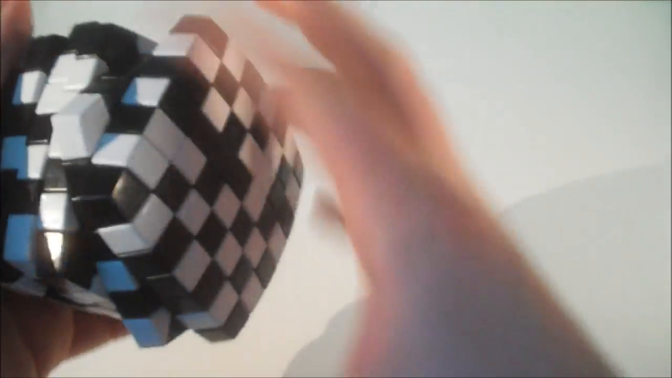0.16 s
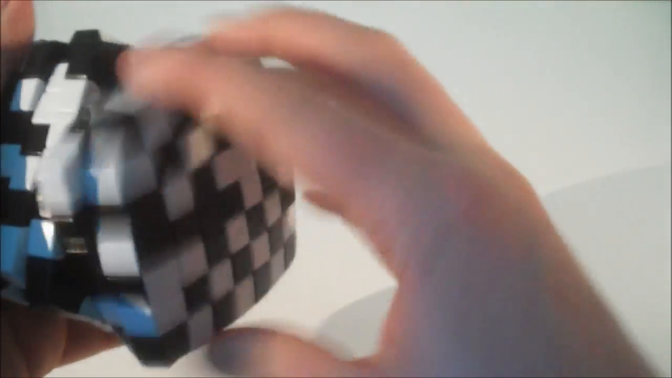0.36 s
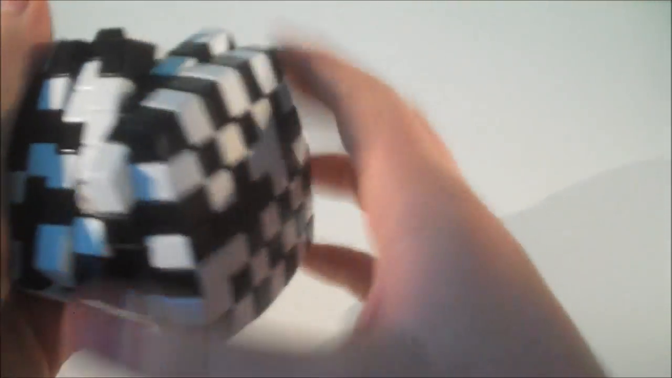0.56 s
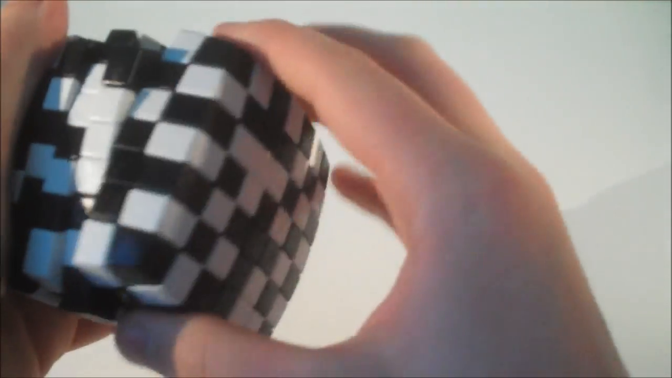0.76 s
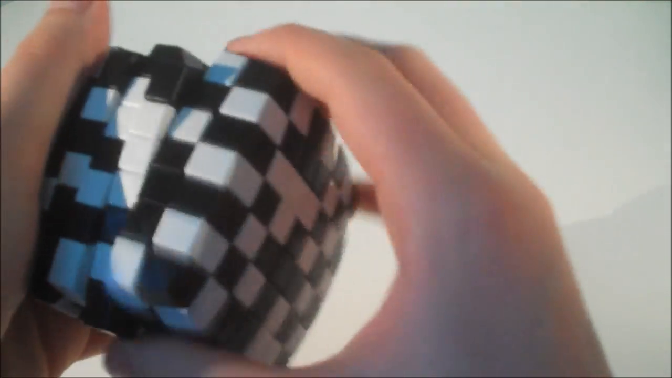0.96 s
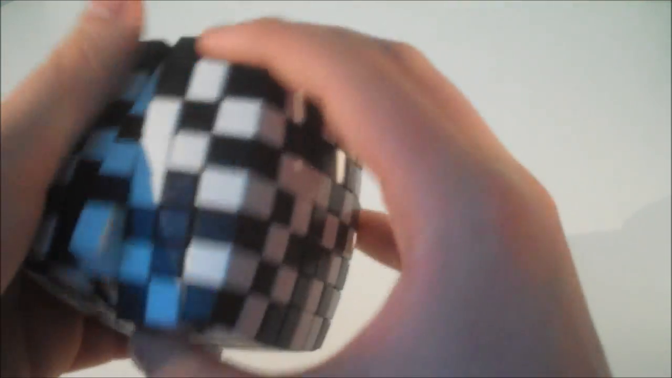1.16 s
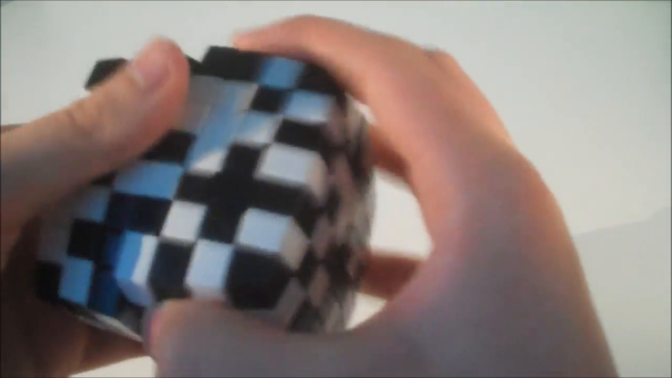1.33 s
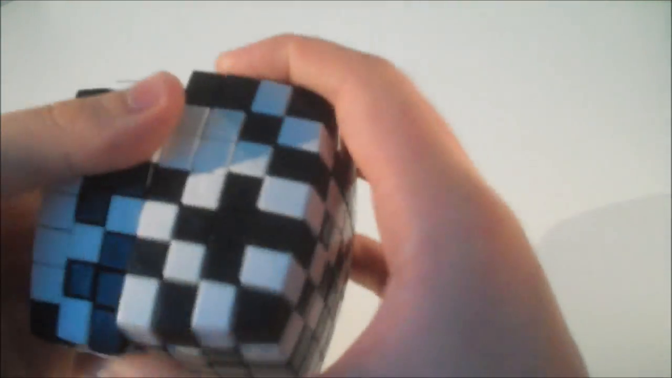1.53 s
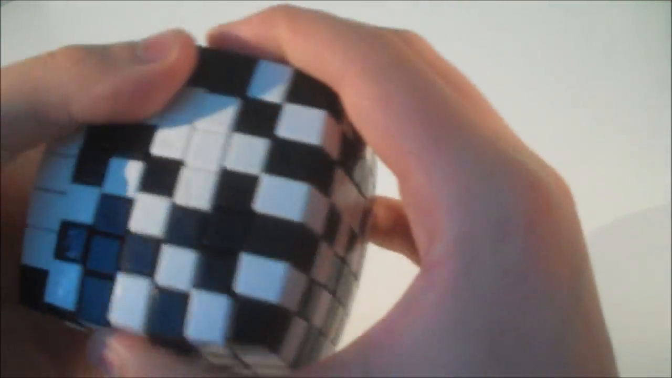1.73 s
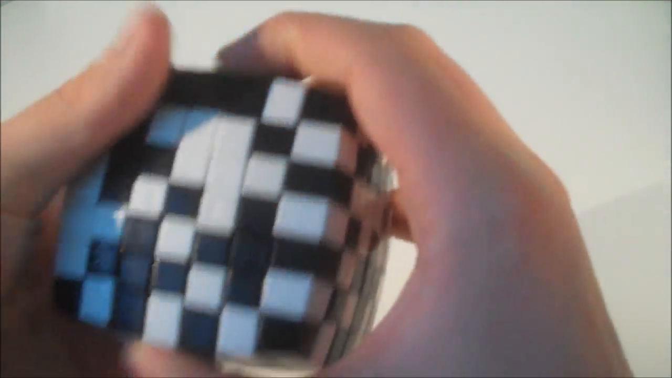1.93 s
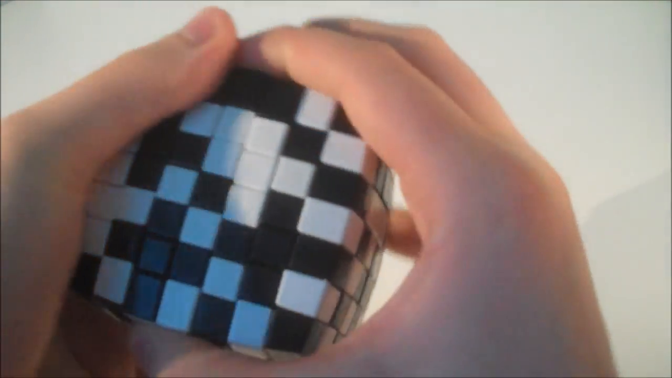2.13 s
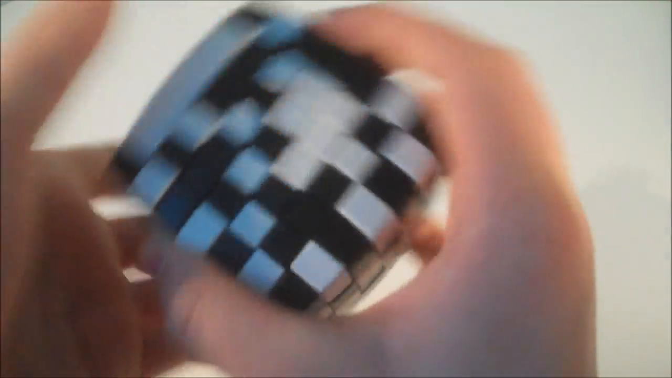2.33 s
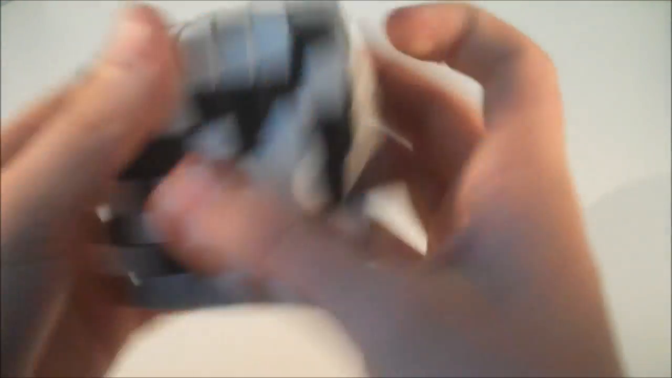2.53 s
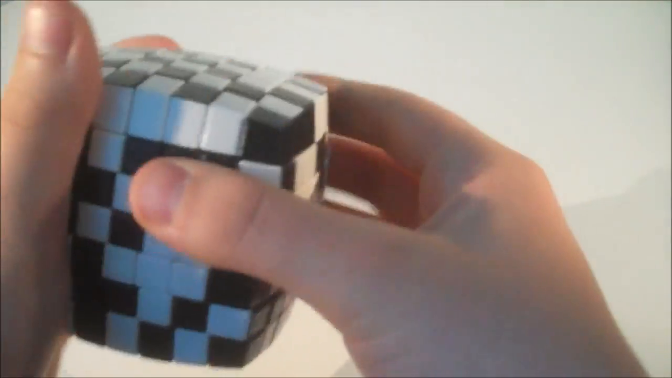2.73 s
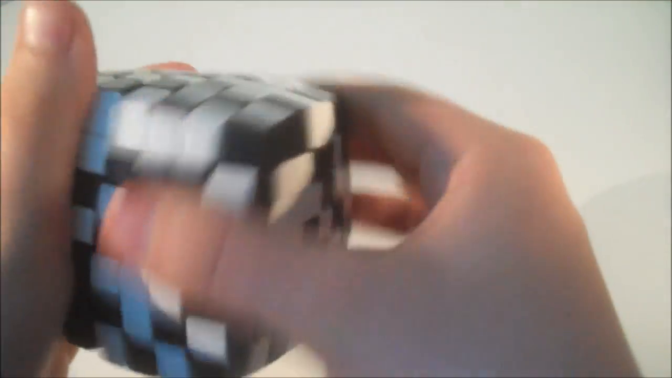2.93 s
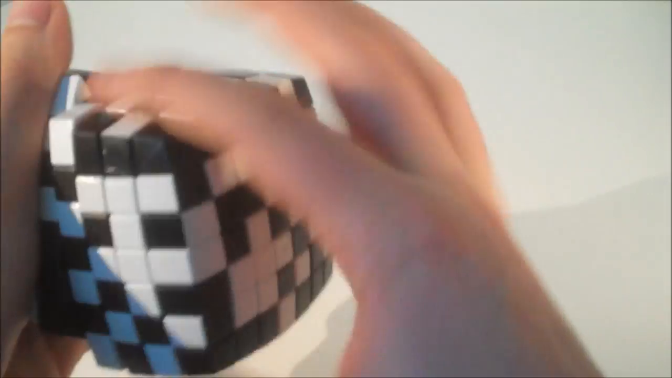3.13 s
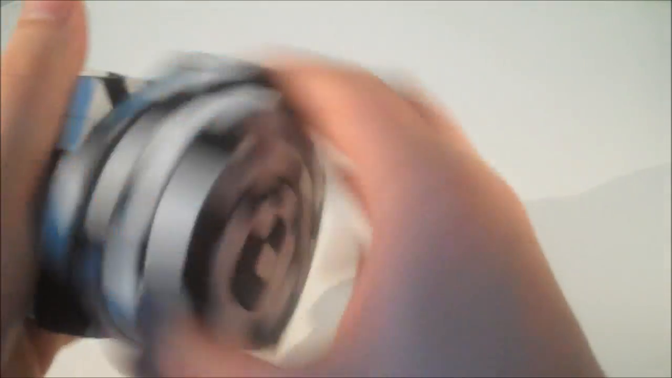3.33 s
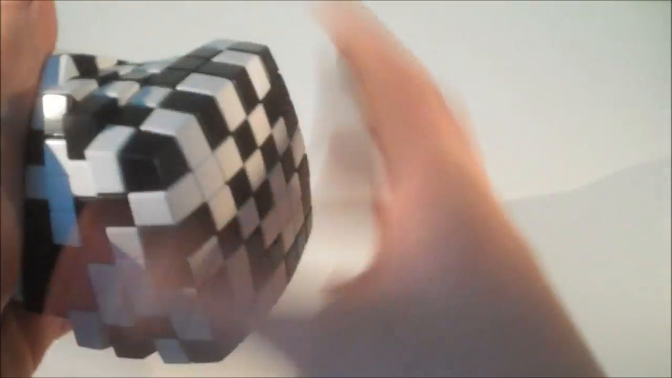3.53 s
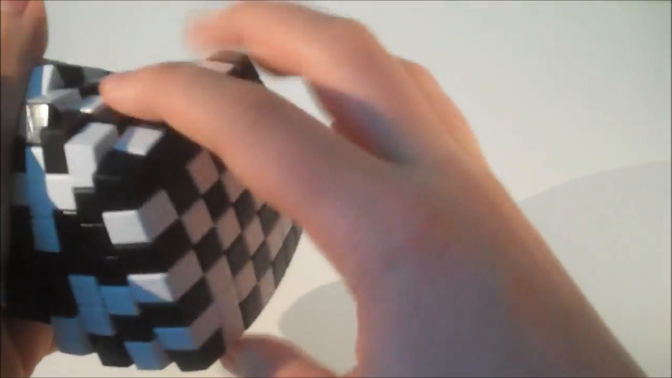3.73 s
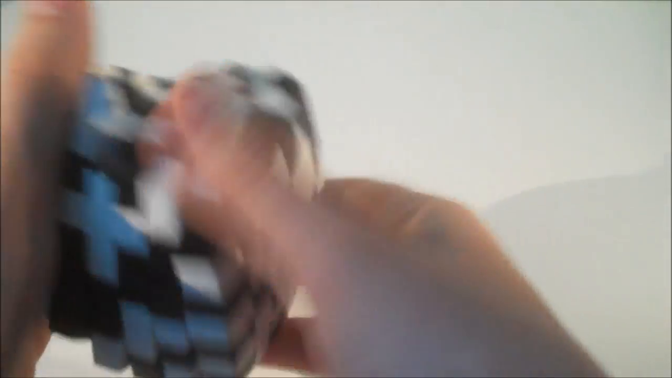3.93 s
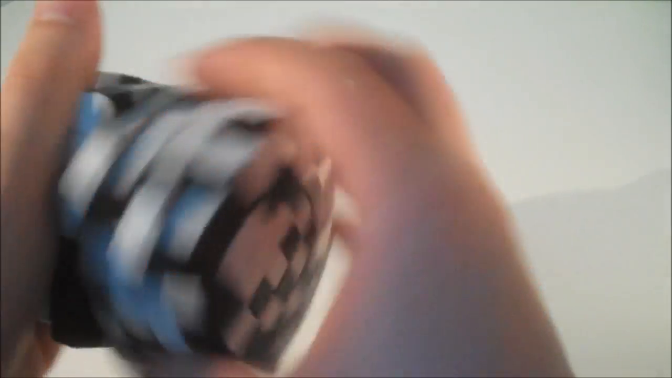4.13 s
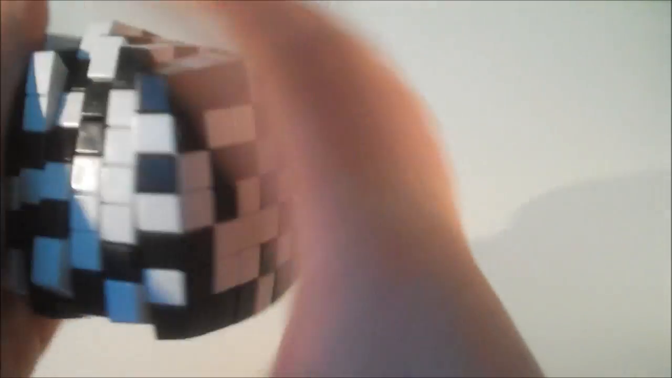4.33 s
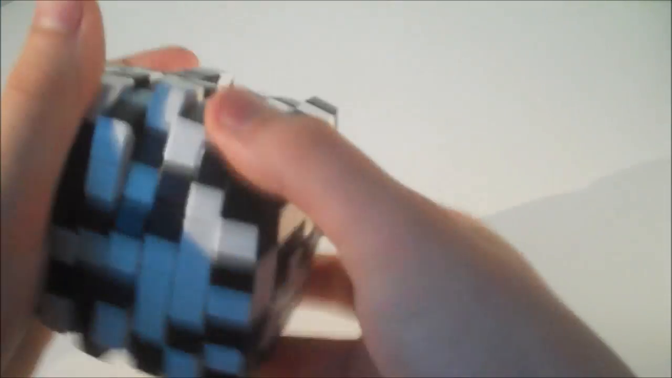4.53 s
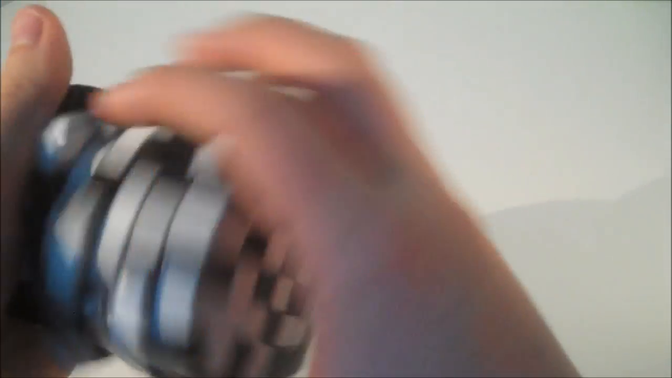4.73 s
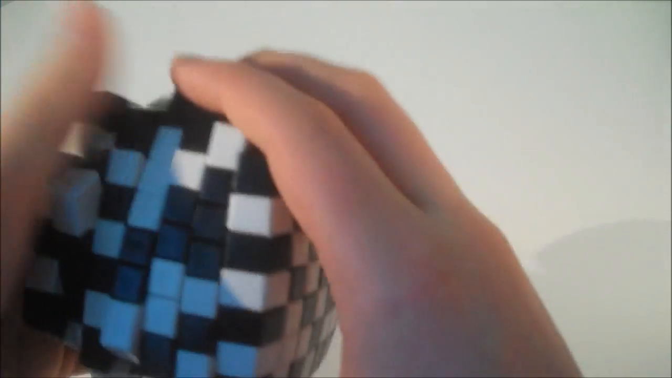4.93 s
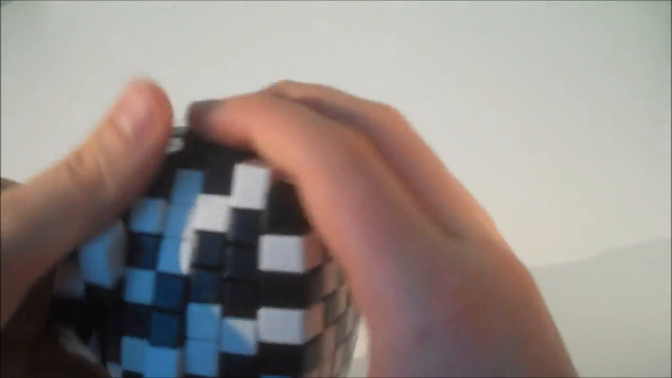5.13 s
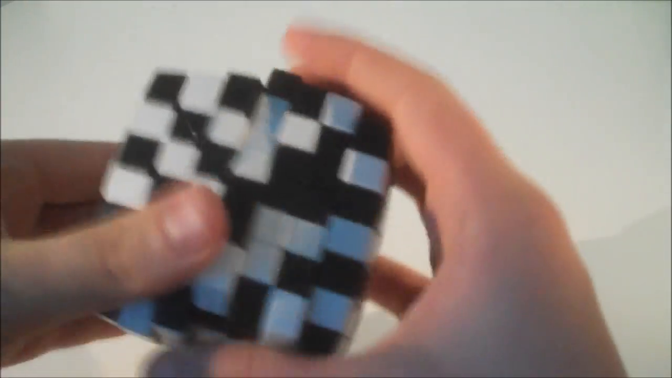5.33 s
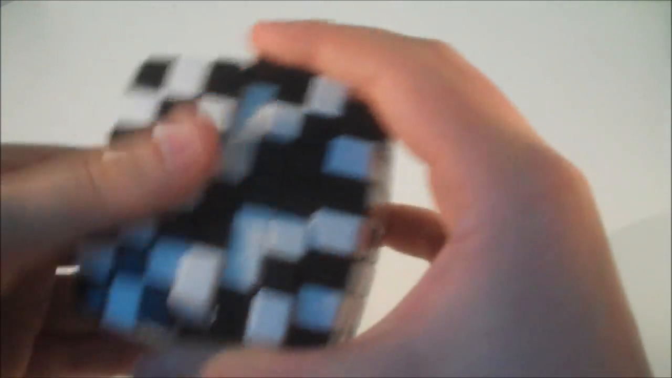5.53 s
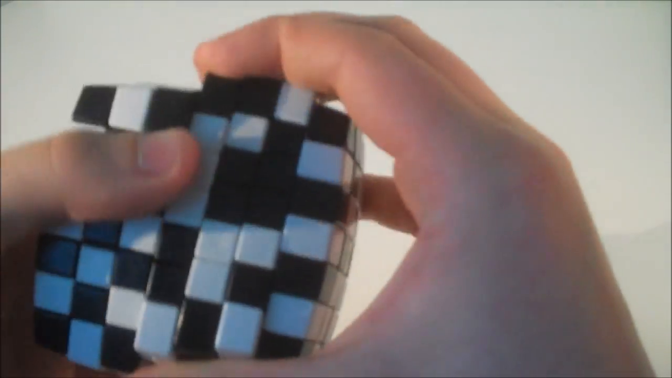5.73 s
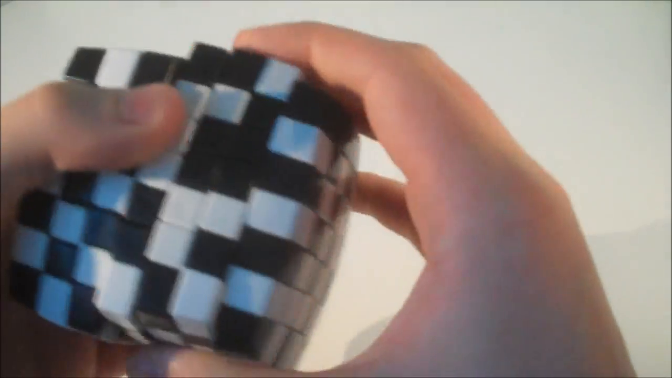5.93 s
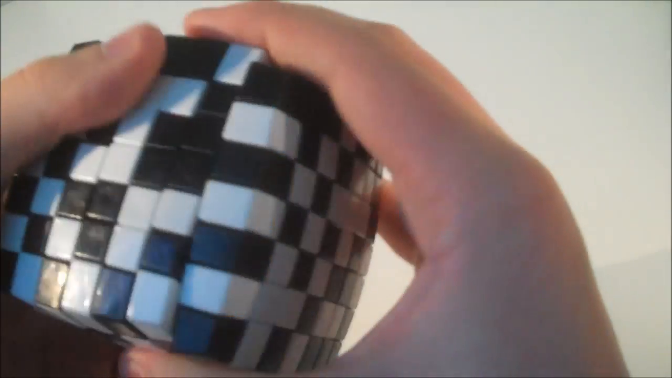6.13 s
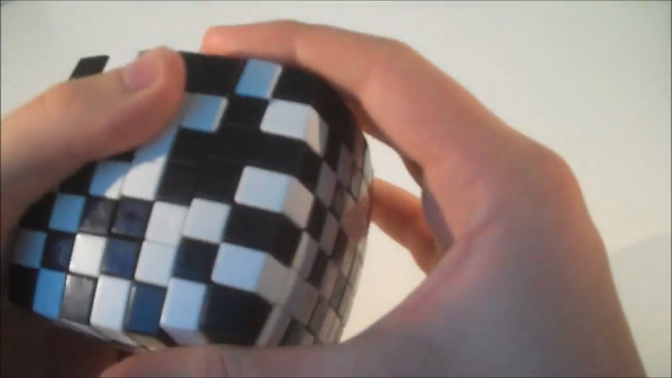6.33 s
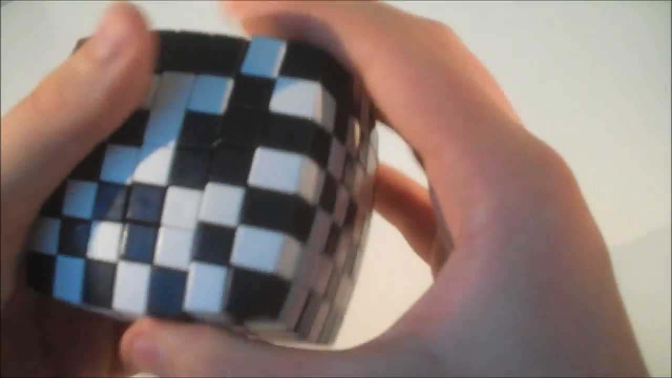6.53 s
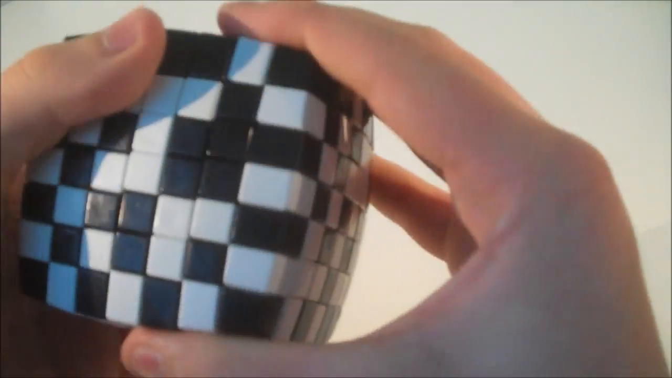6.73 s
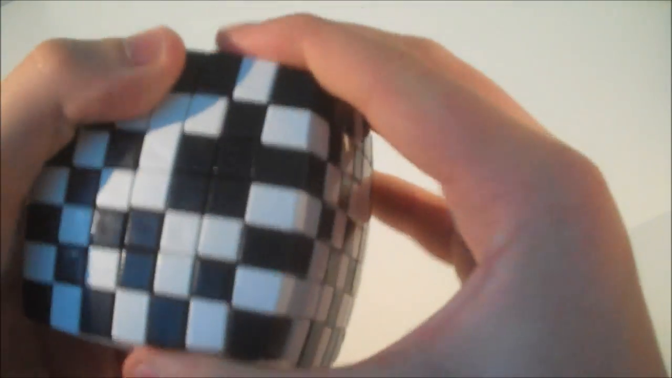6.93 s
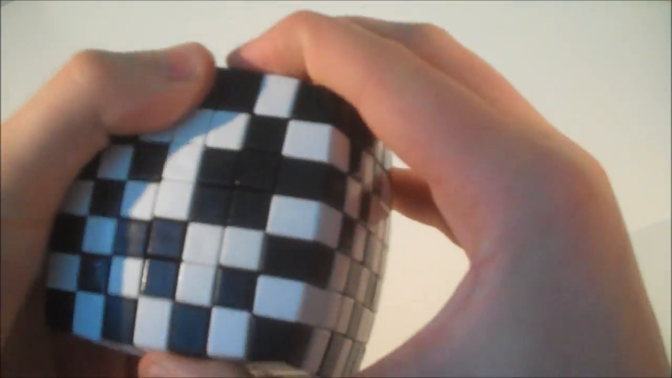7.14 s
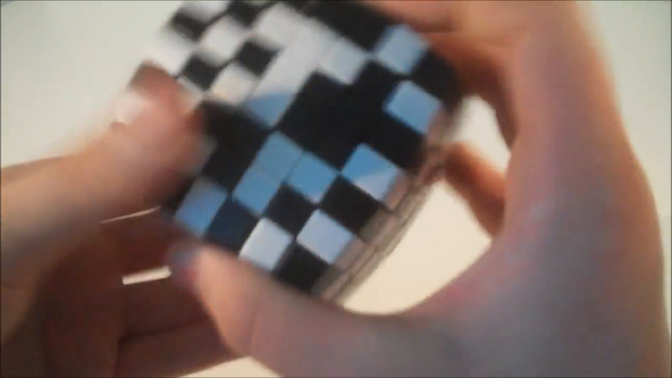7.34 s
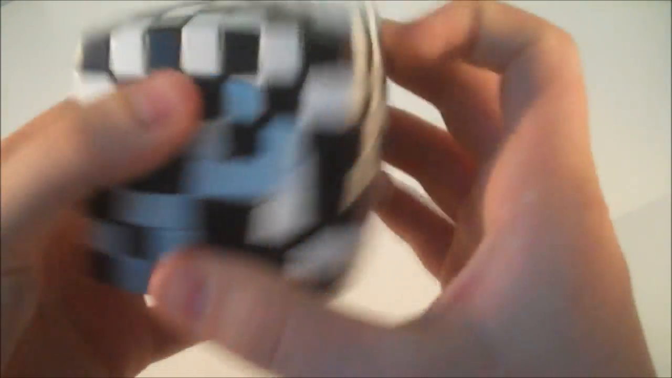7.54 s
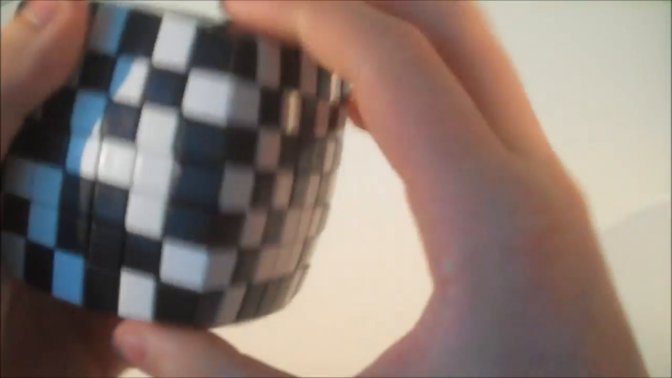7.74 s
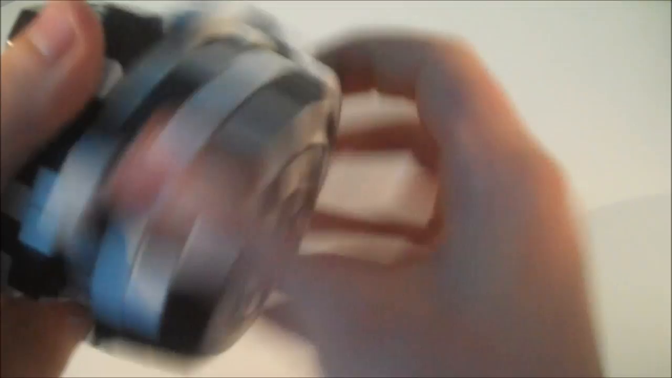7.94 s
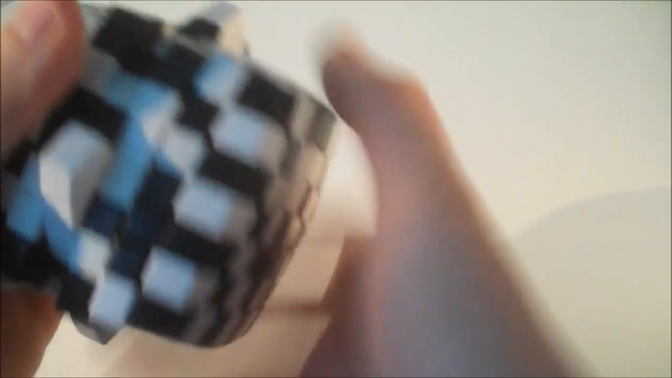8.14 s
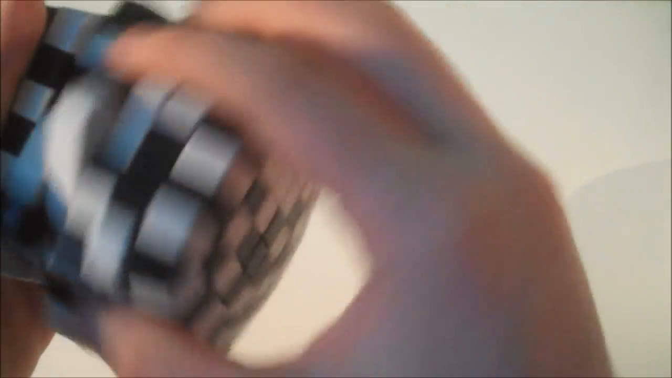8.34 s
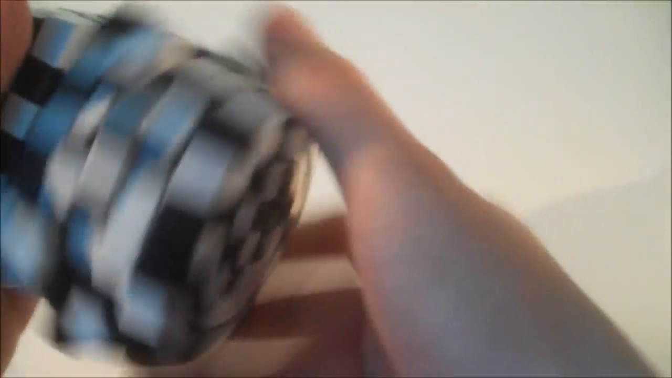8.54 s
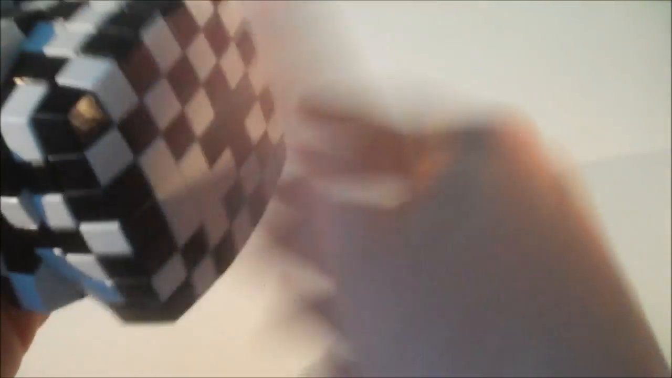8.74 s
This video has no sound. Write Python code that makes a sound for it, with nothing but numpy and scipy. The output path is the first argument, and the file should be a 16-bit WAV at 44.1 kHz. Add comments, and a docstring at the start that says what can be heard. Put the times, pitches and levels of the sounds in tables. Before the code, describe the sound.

Hard plastic layers snap and rasp in quick bursts between stretches of fine clicking and rubbing, close and dry over faint room hum.

```python
"""A many-layered plastic puzzle cube is turned quickly by hand, close to a stereo microphone in a small room.
Small pieces click as layers are lined up; a fast turn drags rows of them into a dense rasp.
Each contact is a noise burst with a snap and random ring pitches; modal resonators add the hollow body.
Decaying noise makes the short room tail; noise and sines that swell slowly together make the soft air
and low mains hum."""
import sys
import numpy as np
from scipy import signal
from scipy.fft import rfft, irfft, next_fast_len
from scipy.io import wavfile
from scipy.ndimage import uniform_filter1d

SR = 44100
rng = np.random.default_rng(int(sys.argv[2]) if len(sys.argv) > 2 else 0)


def master(y):
    """Save y as 16-bit WAV."""
    cut = np.clip(np.atleast_2d(y).T, -1, 1)
    pcm = np.round(cut * 32767)  # scale
    wavfile.write(sys.argv[1], SR, pcm.astype(np.int16))


N = 386757
TIME = np.arange(N) / SR
RING, LEAD = 2048, 256  # samples: length of one contact, lead-in before its snap

# stretches in which the fingers work the layers into line: start_s, end_s, rubbing_level_db
ALIGNING = [(1.05, 2.05, -53), (2.05, 2.38, -58), (2.46, 2.999, -55), (5.18, 6.001, -55), (6.03, 6.93, -53),
            (7.03, 7.18, -52), (7.34, 7.77, -53)]


def undb(db):
    """Amplitude ratio of a level in dB."""
    return 10 ** (np.asarray(db) / 20)


def unit(x):
    """Scales to an RMS of 1."""
    return x / np.sqrt(np.mean(x ** 2))


def along(table, size):
    """Reads a (Hz, value) table at the bins of a transform, on a log-frequency axis."""
    hz, value = np.transpose(table)
    bins_hz = np.fft.rfftfreq(size, 1 / SR)
    return np.interp(np.log(bins_hz + 1), np.log(hz), value)


def coloured(x, table):
    """Causal filter with a (Hz, dB) response, from the folded cepstrum."""
    size = 2 * next_fast_len(x.shape[-1])
    cepstrum = irfft(np.log(undb(along(table, size))))
    cepstrum[1:size // 2] *= 2
    cepstrum[size // 2 + 1:] = 0
    response = np.exp(rfft(cepstrum))
    return irfft(rfft(x, size) * response)[..., :x.shape[-1]]


def fade(t, t60):
    """Exponential decay, 60 dB down after t60 seconds."""
    return np.exp(-np.log(1000) * t / t60)


def through(x, response):
    """Convolves each channel with its response."""
    return signal.fftconvolve(np.atleast_2d(x), np.atleast_2d(response), axes=1)[:, :N]


def add(out, s, sound):
    """Mixes a contact into out so that its snap falls at time s."""
    start = int(np.clip(s * SR - LEAD, 0, N - 1))
    out[:, start:start + sound.shape[1]] += sound[:, :N - start]


def piece(knock_db, edge_db, scrape, snap=3.64, scrape_s=0.0023, rebound=0.43, rebound_s=.005,
          chatter_t60=0.021, ring_t60=0.015, ring=0.46, ring_hz=4512.0, ring_octaves=0.793,
          lag_s=2.4e-5, lag_scatter=0.32):
    """One contact: a brief scrape, a snap, the ring of that piece, and a softer rebound among its neighbours."""
    # colour of a contact between plastic pieces: pitch_hz, gain_db
    plastic = [(88, -57), (150, -24), (687, -14), (850, -5.5), (918, -2.5), (1160, -9.5), (1320, -13.5),
               (2360, -5.5), (2700, -1.5), (3970, -0.5), (5610, -2.5), (10400, -10), (13600, -26),
               (15000, -27)]
    # how unlike the two microphone ports hear a piece: pitch_hz, side_noise_db
    spread = [(300, -25), (1000, -15), (3000, -9.5), (7000, -7), (13000, -8.5)]
    t = (np.arange(RING) - LEAD) / SR
    after = np.maximum(t, 0)
    pitches_hz = ring_hz * 2 ** (ring_octaves * rng.standard_normal(size=(3, 1)))
    pitches_hz = np.minimum(pitches_hz, SR / 2)
    own = ring * np.sin(2 * np.pi * pitches_hz * after).sum(axis=0) * fade(after, ring_t60)

    slide, wait, share, hardness = .5 + rng.random(size=4)
    rub = scrape * np.exp(-np.abs(t) / (scrape_s * slide))
    chatter = np.where(t < 0, rub, fade(after, chatter_t60))
    late = t - rebound_s * wait
    bounce = rebound * share * (late > 0) * fade(np.abs(late), chatter_t60)
    mid, side = rng.standard_normal((2, RING)) * np.hypot(chatter, bounce)
    mid = mid + own
    # snap: push and recoil, so mostly treble
    mid[LEAD] += snap * hardness
    mid[LEAD + 2] -= snap * hardness

    side = coloured(side, spread)
    pair = coloured(np.array([mid + side, mid - side]), plastic)
    # a broad face knocks low, a sharp corner ticks high
    pair = coloured(pair, [(1300, knock_db), (2600, 0.032), (4500, 0.011), (7500, edge_db)])
    # right-port delay, scattered from piece to piece
    lag = lag_s * (1 + lag_scatter * rng.standard_normal())
    delay = np.exp(-2j * np.pi * np.fft.rfftfreq(RING, 1 / SR) * lag)
    pair[1] = irfft(rfft(pair[1]) * delay)
    return pair / np.sqrt(np.mean(pair[:, LEAD:2 * LEAD] ** 2))


def clicks(gain_db, knock_db, edge_db, scrape=0.59, hard_db=-23, scrape_slope=0.48):
    """Each snap is played by a piece of its own; the harder it jams, the more it scrapes before it gives."""
    # pieces snapping into place: time_s, level_db (before gain_db), brightness_db
    snaps = [(.057, -24, 0), (.094, -27, -8), (.116, -23.5, 1), (.391, -37, 10), (.451, -24, 0.5),
             (.708, -51.5, 2), (.741, -38.5, -2), (.845, -42, 13), (.854, -27, 6), (.936, -42, -4),
             (1.046, -42, -2), (1.066, -30, -2), (1.102, -26, 9), (1.12, -23, 4.5), (1.175, -30.5, 5),
             (1.226, -32.5, -4), (1.246, -39, -5), (1.268, -35, -5), (1.297, -23.5, 9), (1.317, -31, 14),
             (1.378, -29, -1), (1.43, -20, 0), (1.558, -37.5, -8), (1.585, -35, -8), (1.615, -33, -11),
             (1.672, -24.5, -5), (1.71, -27, -8), (1.748, -31.5, -6), (1.809, -31.5, -15),
             (1.831, -24.5, 2), (1.857, -29.5, 0), (1.905, -30.5, -7.5), (1.924, -31, -3),
             (2.02, -44, -6.5), (2.055, -44, -15), (2.184, -36.5, -13), (2.125, -46, -19),
             (2.248, -38.5, -9.5), (2.322, -42, -10), (2.344, -41, -10), (2.367, -40, -3),
             (2.451, -37.5, 5), (2.47, -29, 5), (2.513, -32, 5), (2.625, -31.5, 3.5), (2.696, -31, 3),
             (2.719, -31, -3), (2.743, -38.5, 3), (2.817, -27, -2), (2.837, -38, -8), (2.851, -27, 0),
             (2.886, -26, -4), (2.916, -25, -10), (2.983, -39, -7), (3.007, -37.5, -10), (3.105, -22, 1),
             (3.135, -20.5, 5), (3.167, -20.5, 8), (3.3, -50, -2.5), (3.372, -39, -7.5), (3.407, -31.5, 12),
             (3.434, -27, 2), (3.452, -30, 10), (3.478, -25.5, 13), (3.567, -42, -6), (3.702, -40.5, 0),
             (3.806, -22.5, 4), (3.894, -41.5, 2), (4.012, -49, 9), (4.097, -43, -6), (4.167, -25, -7),
             (4.193, -25, 11), (4.278, -25, 4), (4.555, -51, -4), (4.578, -36.5, -8), (4.612, -41, 3),
             (4.68, -34, 11), (4.702, -25, 19), (4.766, -26, 5), (4.778, -23.5, 13), (4.828, -26, 12),
             (4.954, -44, 2), (5.068, -51, -4.5), (5.164, -33.5, -0.5), (5.229, -40.5, -8),
             (5.304, -28, 14), (5.381, -31.5, 9.5), (5.431, -40, 3), (5.479, -49, 0), (5.546, -40, -15),
             (5.58, -34, 7), (5.636, -34, 0), (5.669, -38, -3), (5.683, -46, -3), (5.715, -44.5, -16),
             (5.802, -34, -13), (5.831, -35.5, -1), (5.852, -36.5, -2), (5.905, -31, -5), (5.926, -34, -9),
             (6.034, -43.5, -14), (6.072, -42.5, -3), (6.104, -32.5, -7), (6.127, -39, -18),
             (6.148, -30.5, -3), (6.203, -22.5, -5.5), (6.284, -40.5, -21), (6.331, -34, -6),
             (6.355, -36, -2), (6.388, -29, -2), (6.398, -28, -8), (6.448, -34.5, -12), (6.475, -31, 5),
             (6.497, -31, -9), (6.562, -29.5, -11.5), (6.608, -34.5, -3.5), (6.665, -36.5, -8),
             (6.712, -26.5, -4.5), (6.751, -33, -9), (6.81, -27.5, -5.5), (6.823, -32.5, -15),
             (6.869, -29.5, -5), (6.91, -34.5, -10.5), (7.004, -41, -8), (7.04, -41.5, -15),
             (7.053, -39.5, -7), (7.088, -36, -12), (7.121, -30.5, -9.5), (7.158, -28.5, -12.5),
             (7.289, -40, -5), (7.328, -22, 13), (7.339, -26.5, 9), (7.386, -35.5, -14), (7.401, -38, 5),
             (7.429, -43, 5), (7.465, -29.5, 1), (7.5, -38, 1), (7.524, -38.5, -2), (7.542, -39.5, -2),
             (7.579, -33, -9), (7.651, -31.5, 2.5), (7.687, -30, 1), (7.733, -39, -17), (7.76, -46, 7),
             (7.879, -33, -6), (7.897, -39, -13), (7.928, -21, -0.5), (7.968, -19, 12), (7.991, -18.5, -12),
             (8.029, -22, 6), (8.067, -19, 6), (8.084, -20, 5), (8.121, -25, -1), (8.222, -41.5, -9.5),
             (8.245, -45.5, -18), (8.32, -51.5, 8), (8.445, -30.5, -2), (8.483, -24, 14),
             (8.526, -22.5, 12), (8.577, -25, 10), (8.675, -21, 4.5), (8.689, -25, 6.5)]
    out = np.zeros((2, N))
    for s, db, bright in snaps:
        drag = scrape * min(undb(scrape_slope * (db - hard_db)), 1)
        contact = piece(knock_db - 0.54 * bright, edge_db + 0.52 * bright, drag)
        add(out, s, undb(db + gain_db) * contact)
    return out


def grip(grip_s=.03, held_db=-66):
    """Rubbing level in dB while the fingers line up the layers; the grip tightens and loosens over grip_s."""
    db = np.full(N, float(held_db))
    for start, end, level in ALIGNING:
        db[(TIME >= start) & (TIME < end)] = level
    return uniform_filter1d(db, max(int(grip_s * SR), 1))


def push(size=32, catch_db=1.53, catch_s=.006):
    """Sliding level in dB: each turn is an attack, an arched hold and a coast to rest, and catches unevenly."""
    # layers pushed round, from nudges to full flicks: start_s, length_s, level_db, rise_over_turn_db
    pushes = [(.043, 0.096, -30, 6), (.405, 0.08, -35, 2), (0.778, 0.073, -33, 4), (1.095, 0.043, -32, 0),
              (1.294, 0.019, -31, -5), (1.378, 0.058, -30, 11), (1.673, 0.046, -33, 0),
              (1.831, 0.088, -39, 3), (2.697, 0.024, -43, 0), (2.89, 0.043, -32, 2), (3.03, .115, -22, 2),
              (3.41, 0.1, -28, 4), (3.729, 0.075, -27, 4), (4.051, 0.053, -54, 4), (4.141, 0.17, -29, -1),
              (4.66, 0.19, -28, 2), (5.216, 0.056, -46, 0), (5.285, 0.057, -30, -2), (5.431, 0.032, -43, 0),
              (5.766, 0.033, -31, 0), (6.206, 0.017, -29, 0), (6.388, .04, -36, -2),
              (6.588, 0.021, -40, 1.5), (6.81, 0.1, -43, -2.5), (7.125, .05, -44, 1),
              (7.333, 0.017, -34, 0), (7.926, .078, -25, 4), (8.035, 0.093, -23, -0.5),
              (8.385, .045, -47, 8), (8.465, 0.24, -28, 0)]
    attack_db_per_s, arch_db, coast_db_per_s = 1100, 3, 430
    full_turn_s = .12  # shorter turns stop more abruptly
    t = TIME[::size]
    db = grip()[::size]
    for start, length, level, lean in pushes:
        done = np.clip((t - start) / length, 0, 1)
        hold = level + lean * (done - .5) - arch_db * (2 * done - 1) ** 2
        braking = coast_db_per_s * np.sqrt(max(full_turn_s / length, 1))
        before = attack_db_per_s * np.maximum(start - t, 0)
        beyond = braking * np.maximum(t - start - length, 0)
        db = np.maximum(db, hold - before - beyond)
    catches = uniform_filter1d(rng.standard_normal(len(t)), max(int(catch_s * SR / size), 1))
    catches = np.clip(unit(catches), -2, 2)
    return np.interp(TIME, t, db + catch_db * catches)


def rattle(rate, unevenness, count=6000):
    """Moments at which pieces catch and slip, at uneven gaps around a changing rate per second."""
    travel = np.cumsum(rate) / SR
    gaps = np.exp(unevenness * rng.standard_normal(count))
    marks = np.cumsum(gaps / gaps.mean())
    return np.interp(marks[marks < travel[-1]], travel, TIME)


def turns(gain_db=-1, rest_db=-66, fast_db=-25, fast_rate=850, rate_slope=.45, scatter_db=4.0, scrape=0.32,
          slow_knock_db=4, fast_knock_db=0, slow_edge_db=-3, fast_edge_db=1.0, count=64):
    """A slow layer ticks piece by piece; a fast one drags whole rows into a dense, brighter rasp."""
    db = push()
    # below a small force the pieces stay put
    force = np.maximum(undb(db) - undb(rest_db), 0) * undb(gain_db)
    rate = fast_rate * undb(rate_slope * (db - fast_db))  # contacts per second
    # pieces ordered from a gentle, dull touch to a hard, bright one
    touches = np.linspace([slow_knock_db, slow_edge_db], [fast_knock_db, fast_edge_db], count)
    pieces = [piece(knock, edge, scrape) for knock, edge in touches]
    pieces = [p / np.sqrt(np.sum(p ** 2) / 2) for p in pieces]
    moments = rattle(rate, unevenness=.55)
    size, choice = rng.standard_normal((len(moments), 2)).T
    size = unit(undb(scatter_db * np.clip(size, -2, 2)))
    out = np.zeros((2, N))
    for s, blow, pick in zip(moments, size, choice):
        i = int(s * SR)
        speed = min(rate[i] / fast_rate, 1)
        hardness = (speed + (1 + np.tanh(pick)) / 2) / 2
        # sqrt(SR / rate) keeps the power independent of contact density
        level = blow * force[i] * np.sqrt(SR / rate[i])
        add(out, s, level * pieces[int(hardness * (count - 1))])
    return out


def loose_ticks(rate=34, over_db=6.5, scatter_db=1.5, knock_db=7.0, edge_db=-5, colour_db=3, scrape=0.16):
    """Loose pieces tick at random while the layers are lined up, louder the firmer the grip."""
    moments = rattle(np.full(N, float(rate)), unevenness=.7)
    chance = np.clip(rng.standard_normal((len(moments), 2)), -2, 2)
    out = np.zeros((2, N))
    for s, (size, bright) in zip(moments, chance):
        tick = piece(knock_db - colour_db * bright, edge_db + colour_db * bright, scrape)
        for start, end, level in ALIGNING:
            if start <= s < end:
                add(out, s, undb(level + over_db + scatter_db * size) * tick)
    return out


def cube_body(x):
    """The hollow cube rings on after every contact, as a sum of decaying modes."""
    # modes of the hollow cube: pitch_hz, t60_s, resonance_gain_db
    modes = [(845.6, 0.08, 5.5), (1036, 0.19, 0.5), (1150, 0.061, 4), (1426, 0.072, -10),
             (1837, 0.0077, -13), (2790, 0.046, -11.5)]
    t = np.arange(SR // 3) / SR
    response = 0
    for hz, t60, db in modes:
        peak = undb(db) * 2 * np.log(1000) / (t60 * SR)
        response = response + peak * np.cos(2 * np.pi * hz * t) * fade(t, t60)
    return x + through(x, response)


def room(x, wet_db, build_s, low_db, high_db):
    """Small-room reflections build up quickly, then decay at a rate set per band; the lows die soonest."""
    # room tail: pitch_hz, t60_s
    decays = [(200, 0.13), (800, 0.33), (2000, 0.3), (5500, 0.26), (12000, 0.26)]
    t = np.arange(SR // 2) / SR
    mid, side = rng.standard_normal((2, len(t)))
    side = coloured(side, [(300, -6.5), (1000, -13.0), (3000, -3), (6000, 4)])
    noise = rfft(np.array([mid + side, mid - side]))
    tail = 0
    for hz, t60 in decays:
        # triangular band: 1 at this pitch, 0 at its neighbours
        band = along([(f, float(f == hz)) for f, _ in decays], len(t))
        tail = tail + irfft(noise * band, len(t)) * fade(t, t60)
    tail = tail * (1 - np.exp(-(t / build_s) ** 2))
    tail = coloured(tail, [(700, low_db), (3000, 0.0038), (10000, high_db)])
    return through(x, undb(wet_db) * unit(tail) / np.sqrt(len(t)))


def background(air_db, side_db, balance_db):
    """Mains hum sines over soft room noise, nearly alike on both sides, swelling together."""
    # colour of the still air: pitch_hz, relative_level_db
    air_colour = [(20, -5), (48, -3), (75, -7.5), (125, -8.5), (175, -14.5), (270, -7.5), (600, -19),
                  (1500, -14), (5000, -17.5), (11000, -33.5), (15000, -65)]
    # mains hum: pitch_hz, rms_level_db (before swell and balance)
    hum_tones = [(50, -70.5), (100, -69)]
    # strength of hum and air: time_s, gain_db
    swell_points = [(0, 1), (.6, -2.5), (1.2, 4.5), (2.8, 3.5), (3.6, 1.5), (5.2, -4), (5.8, 5), (7.9, 5.5),
                    (8.77, -2.5)]
    mid, side = (unit(coloured(rng.standard_normal(N), air_colour)) for _ in range(2))
    air = undb(air_db) * (mid + undb(side_db) * np.array([side, -side]))
    hum = 0
    for hz, db in hum_tones:
        hum = hum + undb(db) * np.sqrt(2) * np.sin(2 * np.pi * (hz * TIME + rng.random()))
    swell = undb(np.interp(TIME, *np.transpose(swell_points)))
    balance = undb(np.array([[balance_db], [-balance_db]]) / 2)
    return (air + hum) * swell * balance


def scene():
    """The cube is held a little to the left, with its room tail and the background around it."""
    # the small pieces radiate little bass: pitch_hz, gain_db
    radiation = [(150, -4.5), (280, -4.5), (450, 0), (650, -2), (900, -5), (1500, 4), (3000, 1.5)]
    # small differences between the ports: pitch_hz, left_minus_right_db
    port_balance = [(300, 1), (600, 3), (1200, 2.5), (2200, 3.5), (4200, 3), (8000, 1.5)]
    contacts = clicks(gain_db=-1.5, knock_db=2.0, edge_db=-0.5) + turns() + loose_ticks()
    cube = cube_body(coloured(contacts, radiation))
    port_gain = undb(along(port_balance, N) * np.array([[1], [-1]]) / 2)
    cube = irfft(rfft(cube) * port_gain, N)
    tail = room(cube, wet_db=-11.5, build_s=0.008, low_db=11, high_db=-3.5)
    return cube + tail + background(air_db=-62.5, side_db=-5.5, balance_db=1.5)


def record(dry, top_hz=14000):
    """The recorder cuts the top with a steep elliptic low-pass."""
    low_pass = signal.ellip(8, .2, 70, top_hz, fs=SR, output="sos")  # order, ripple dB, stop-band dB
    return signal.sosfilt(low_pass, dry)


dry = scene()
out = record(dry)
master(out)
```